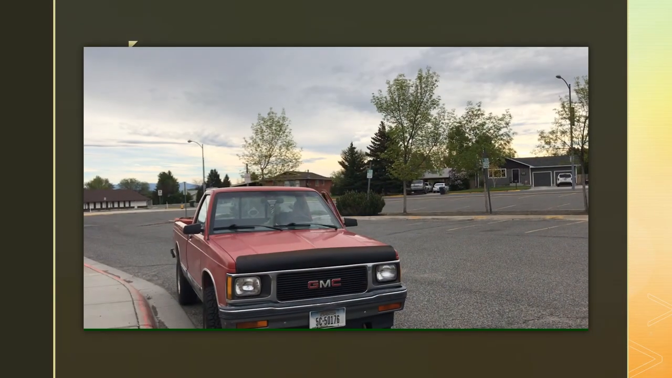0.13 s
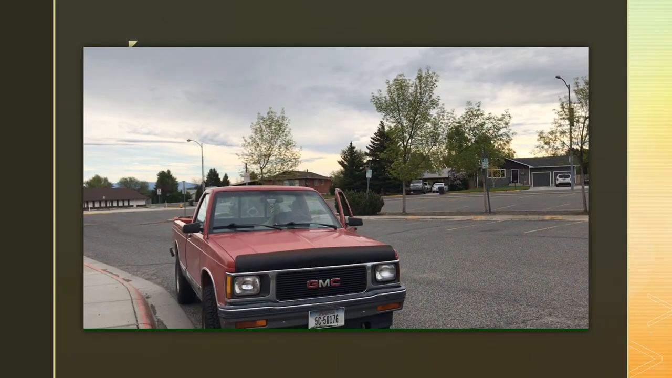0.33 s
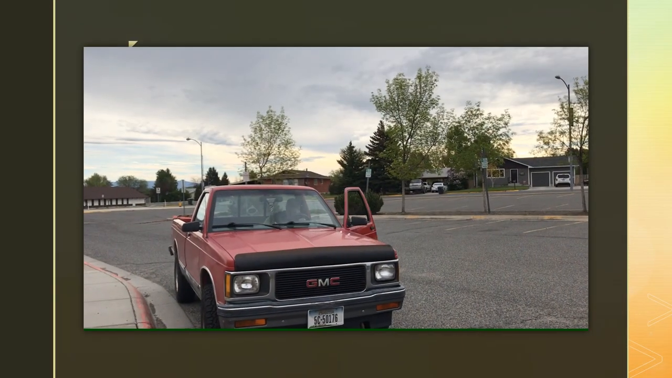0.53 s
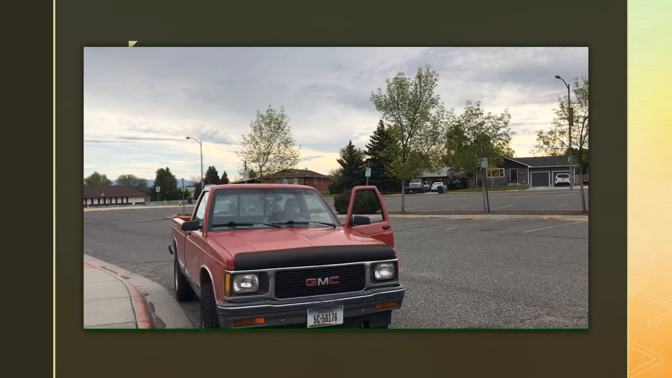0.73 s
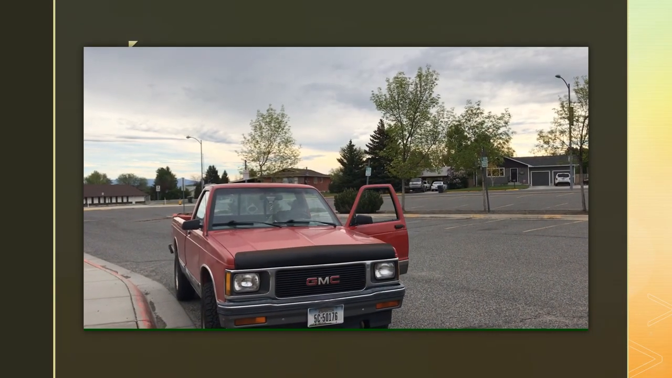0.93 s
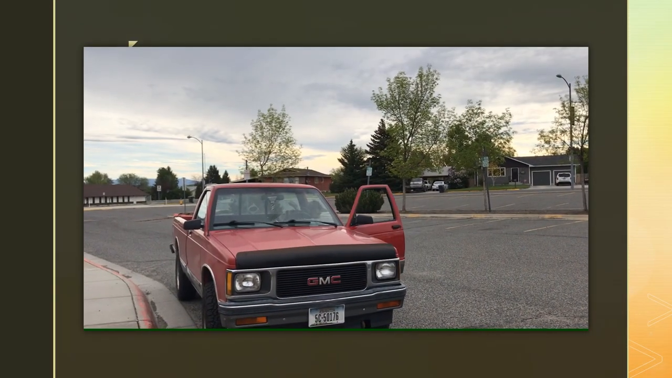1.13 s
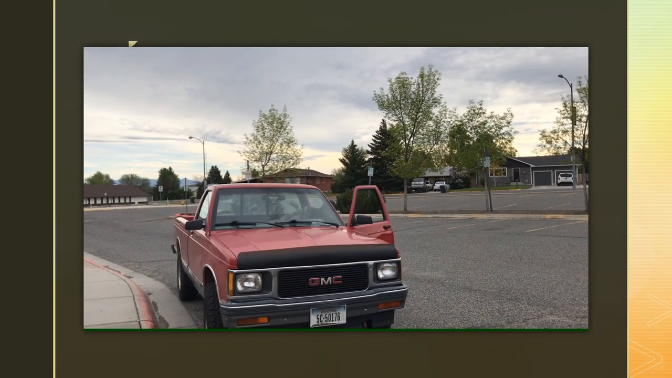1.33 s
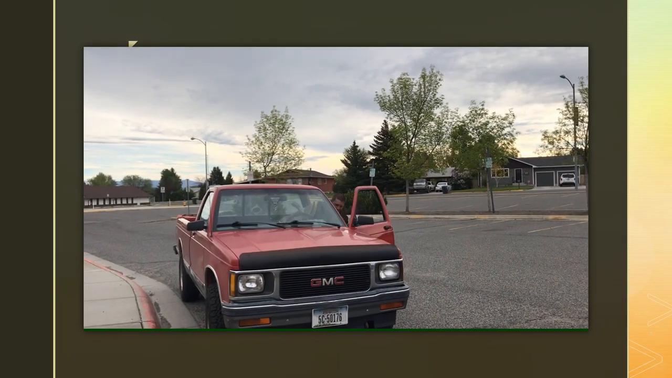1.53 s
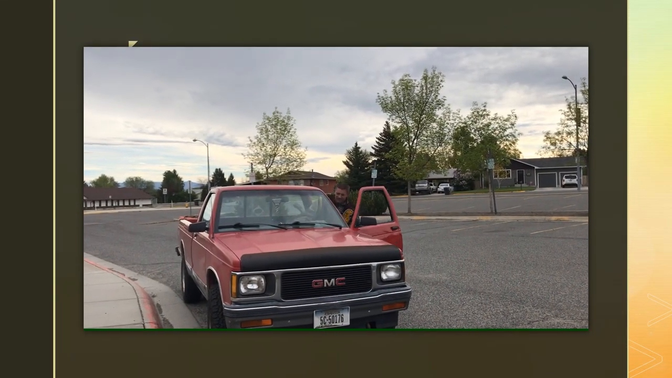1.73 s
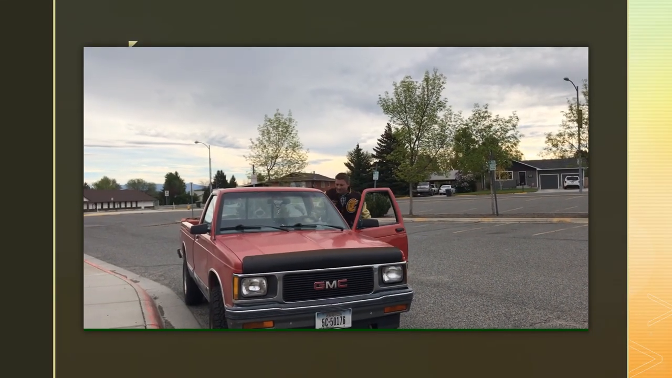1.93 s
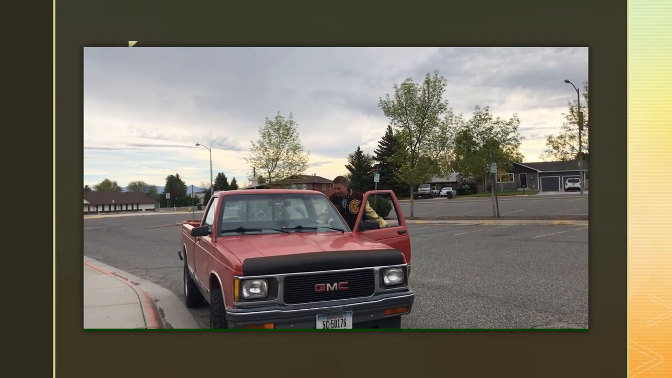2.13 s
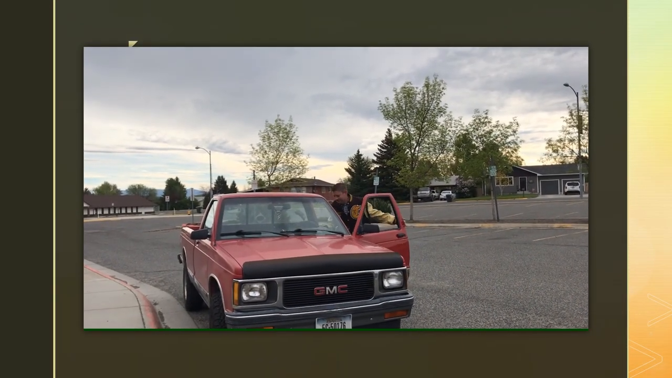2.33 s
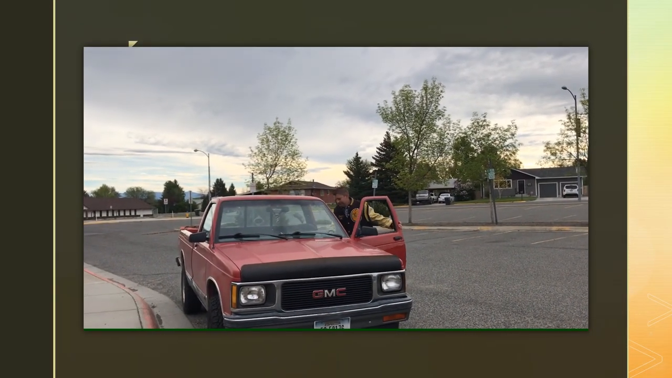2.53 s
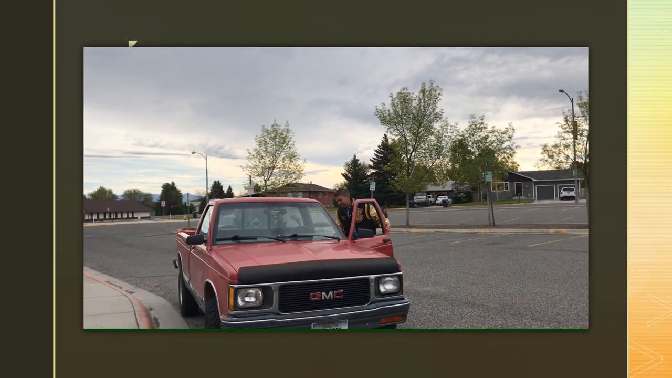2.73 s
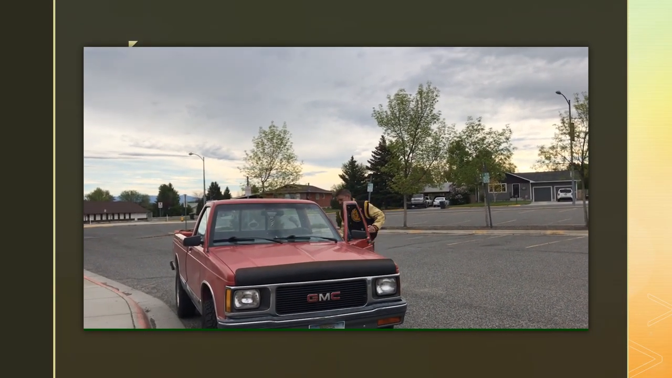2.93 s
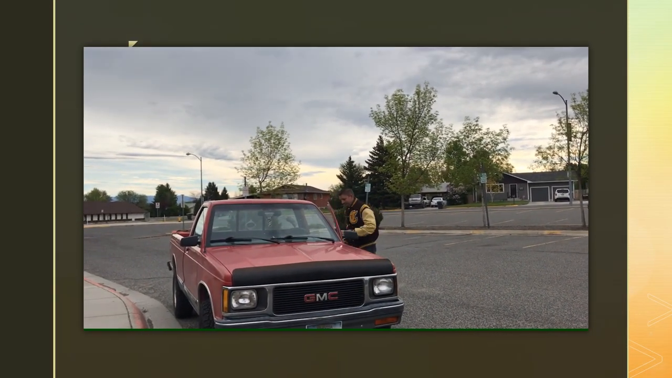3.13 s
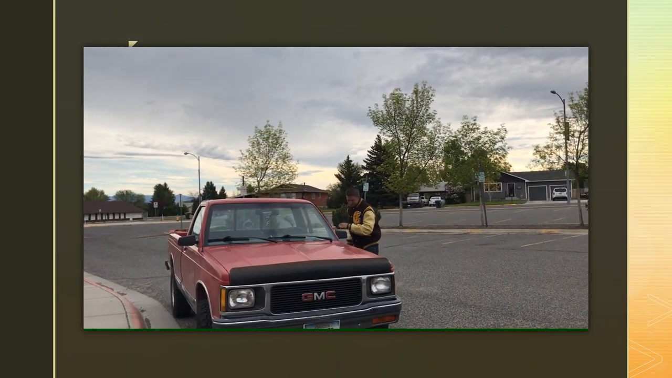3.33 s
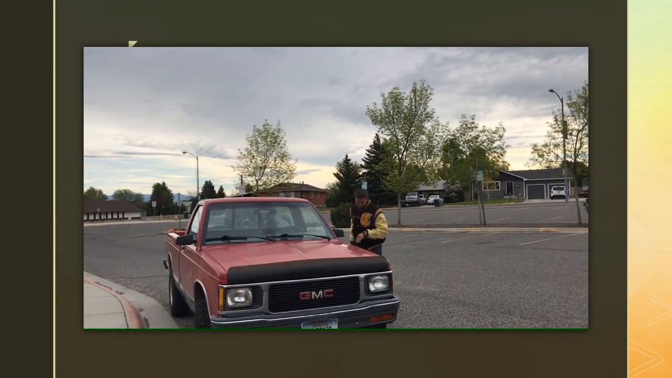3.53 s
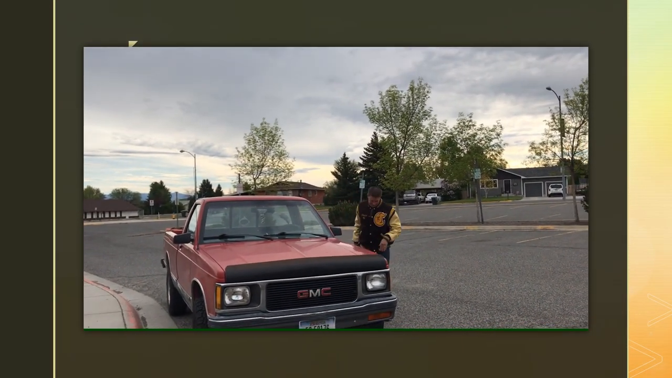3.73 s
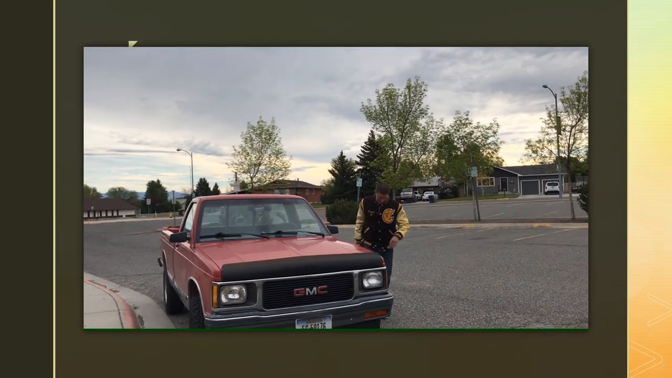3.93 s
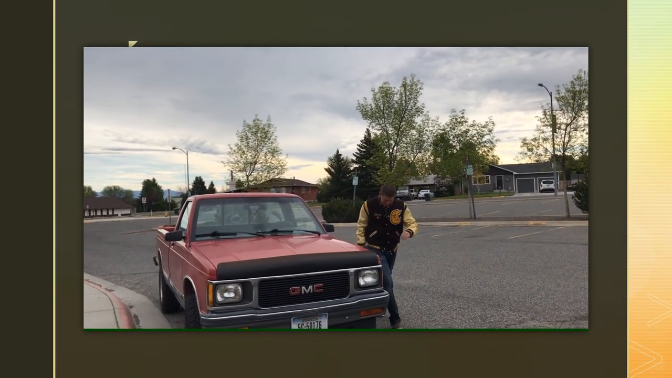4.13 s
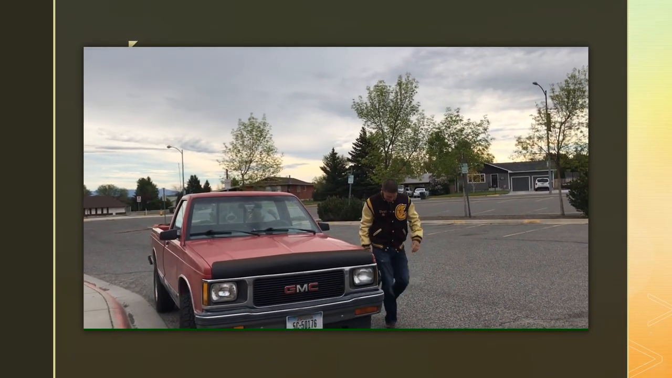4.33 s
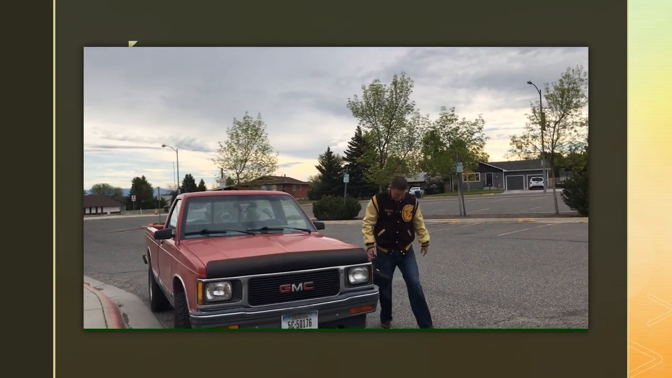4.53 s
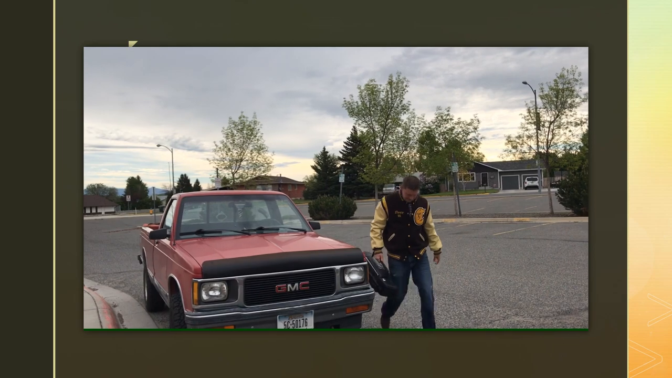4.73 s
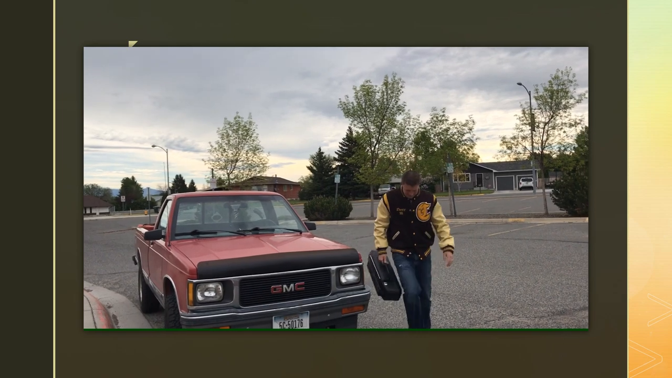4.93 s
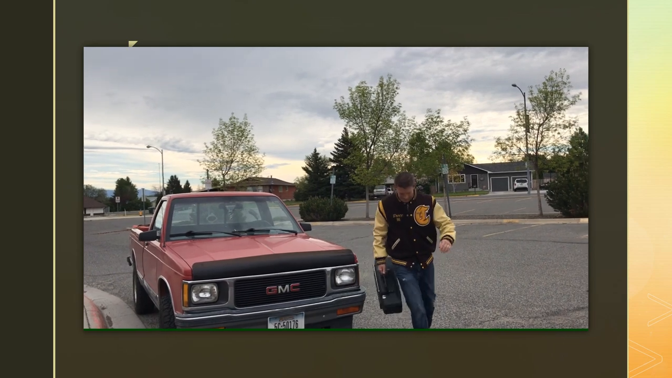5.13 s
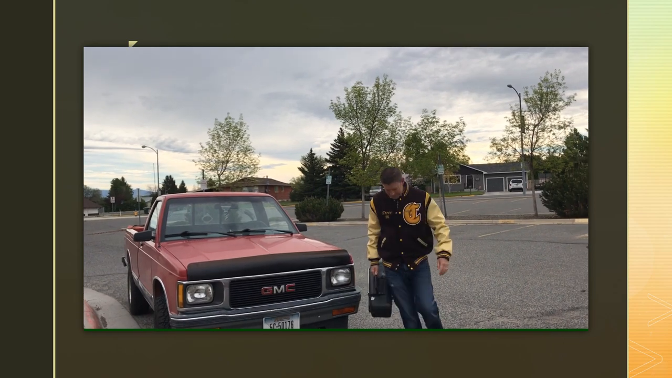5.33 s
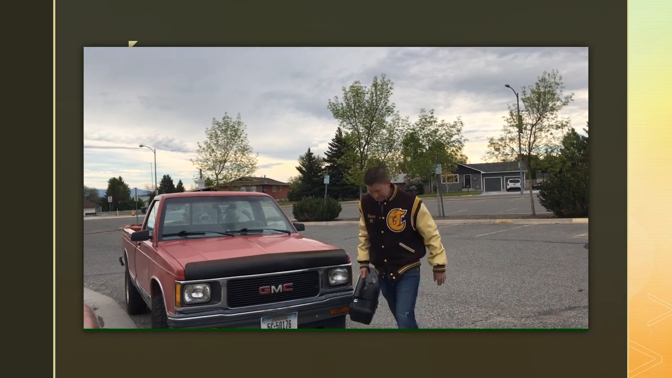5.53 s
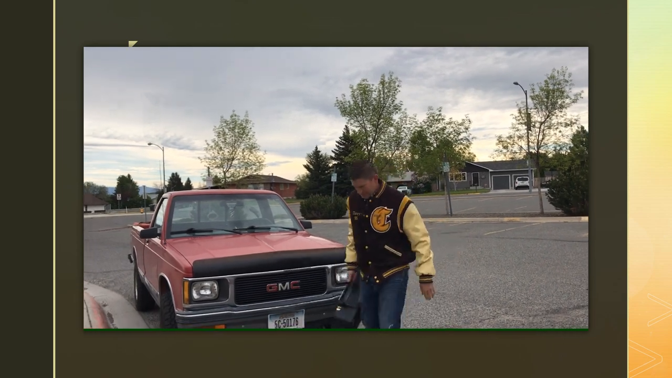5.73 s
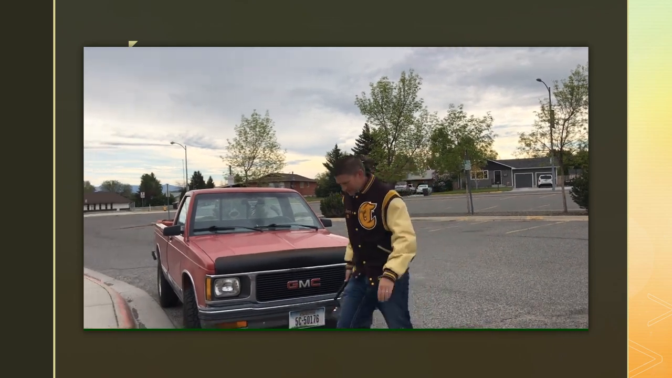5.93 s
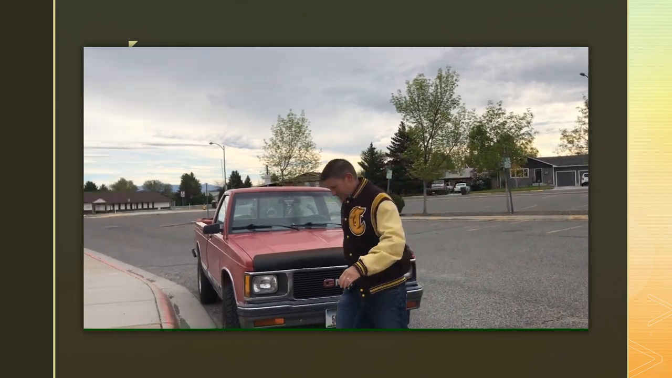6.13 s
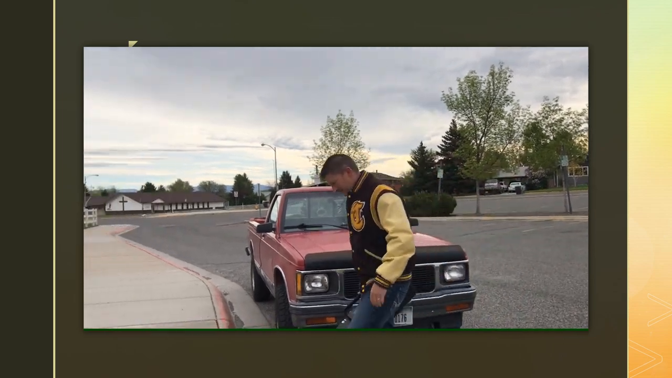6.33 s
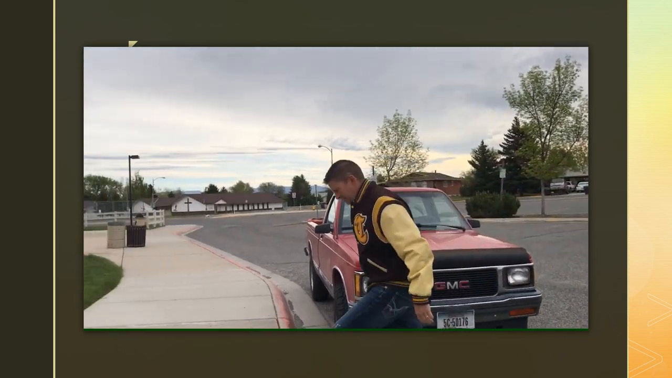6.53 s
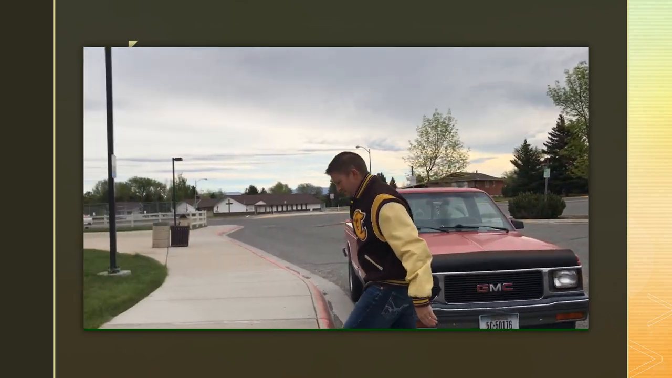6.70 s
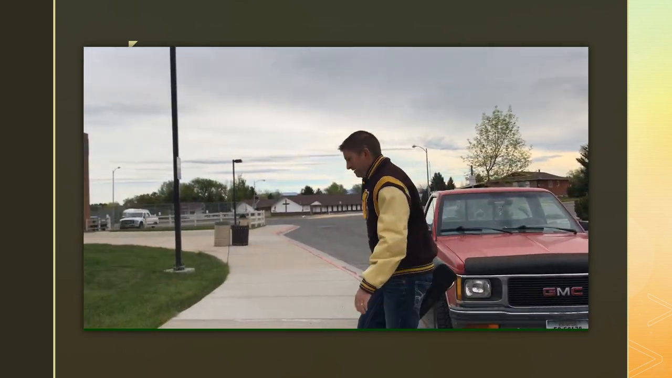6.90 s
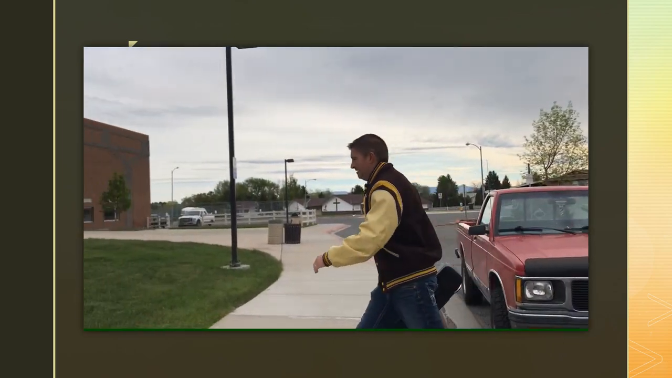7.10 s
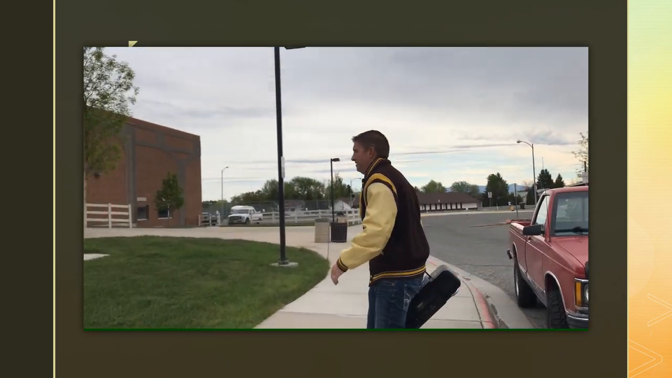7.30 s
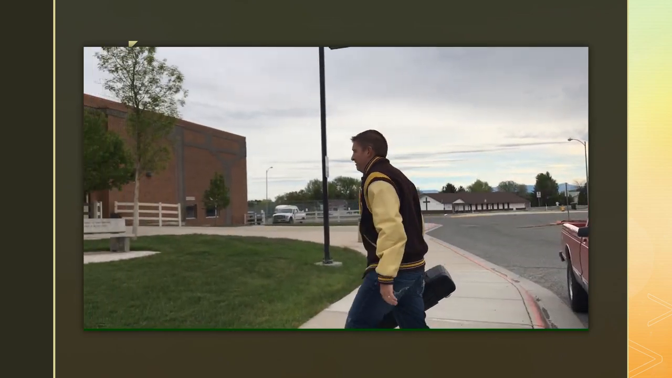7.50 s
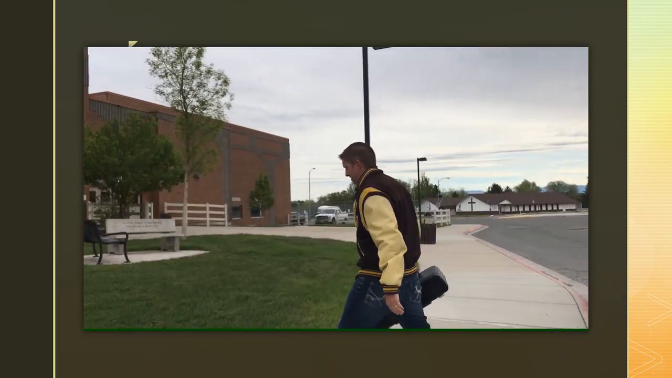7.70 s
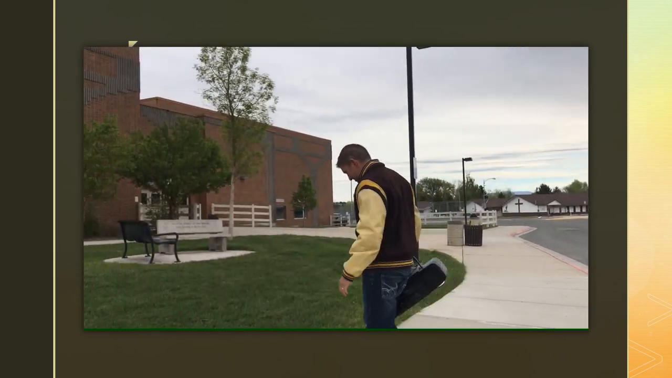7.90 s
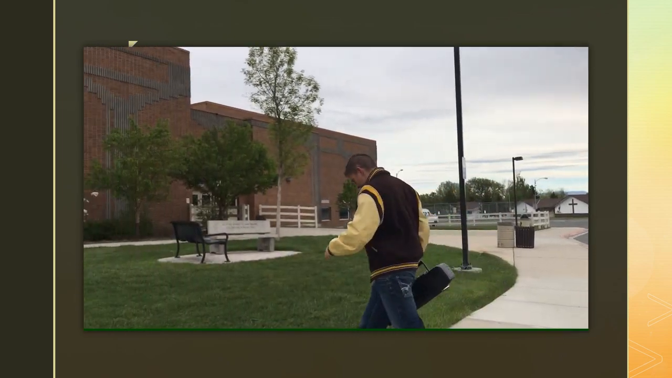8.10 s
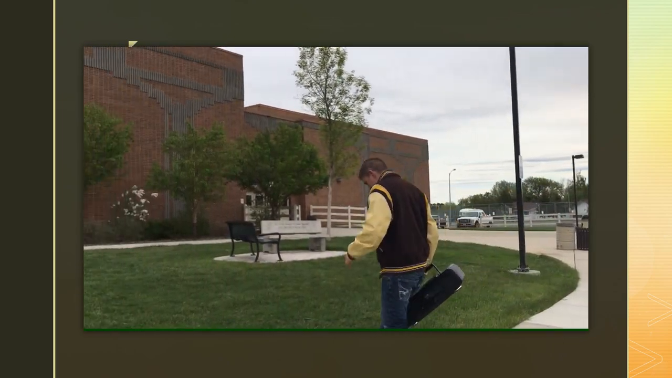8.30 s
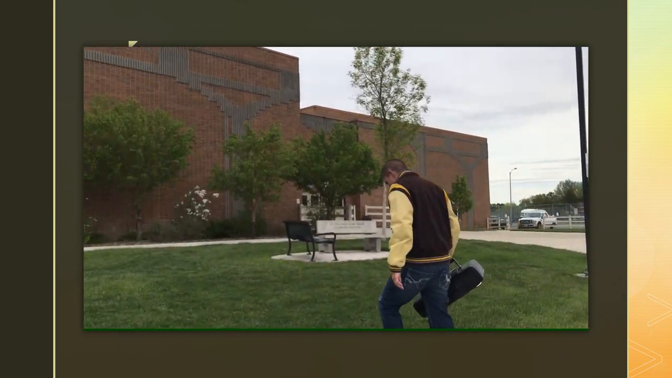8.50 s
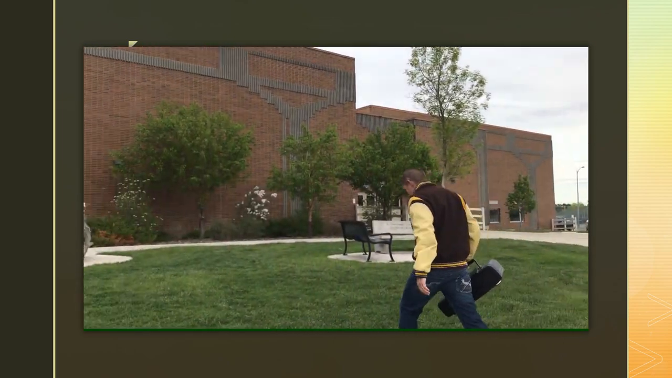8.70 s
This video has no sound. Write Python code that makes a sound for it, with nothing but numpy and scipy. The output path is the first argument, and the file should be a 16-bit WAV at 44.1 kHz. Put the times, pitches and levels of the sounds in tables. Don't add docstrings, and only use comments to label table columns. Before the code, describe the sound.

Outdoors in an open car park, a phone microphone a few metres from a pickup picks up low far traffic. Faint seat clicks and dull knocks lead to one heavy metallic door slam with rattling trim and a short dull echo. Then a hard case knocks the body, gritty footsteps pass with small latch clicks, a far bird chirps thinly, and the steps fade into soft grass.

```python
import sys
import numpy as np
from scipy import signal
from scipy.fft import rfft, irfft
from scipy.io import wavfile
from scipy.ndimage import uniform_filter1d

SR = 44100
rng = np.random.default_rng(int(sys.argv[2]) if len(sys.argv) > 2 else 0)


def volts_from_decibels(level):
    exponent = np.asarray(level, float) / 20
    return 10 ** exponent


def put_to_file(sound):
    columns = np.atleast_2d(sound).T
    safe = np.clip(columns, -1, 1)
    whole_steps = np.round(safe * 32767)
    wavfile.write(sys.argv[1], SR, whole_steps.astype(np.int16))


N = 386139
T = np.arange(N) / SR


def colour(x, table):
    hz, db = np.transpose(table)
    f = np.maximum(np.fft.rfftfreq(len(x), 1 / SR), 1)
    gain = volts_from_decibels(np.interp(np.log(f), np.log(hz), db))
    return irfft(rfft(x) * gain, len(x))


def unit(x):
    return x / np.sqrt(np.mean(x ** 2))


def ring(x, hz, t60):
    pole = np.exp(2j * np.pi * hz / SR - np.log(1000) / (t60 * SR))
    return signal.lfilter([1], [1, -pole], x).imag


def band(x, lo_hz, hi_hz, order=2):
    edges_hz = [lo_hz, min(hi_hz, .49 * SR)]
    return signal.sosfilt(signal.butter(order, edges_hz, "band", fs=SR, output="sos"), x)


def walk(rate):
    k = int(SR / rate)
    held = np.repeat(rng.standard_normal(N // k + 1), k)
    return uniform_filter1d(uniform_filter1d(held, k), k)[:N]


def add(out, s, x):
    i = int(s * SR)
    out[i:i + len(x)] += x[:N - i]


def door():
    # (time [s], crack level [dB], body level [dB], contact [ms])
    blows = [(3.435, -36, -35, 4.8), (3.458, -18, -28, 3.3), (3.464, -21, -19.5, 2.36),
             (3.4687, -20.5, -16.5, 1.2), (3.476, -27, -18, 1.2), (3.481, -36, -32, 2),
             (3.492, -43, -21, 5), (3.503, -37, -34, 4.9), (3.548, -39, -20, 9), (3.575, -53, -29.5, 3.9),
             (3.62, -50, -28, 3.1), (3.648, -50, -34, 1.6)]
    # (frequency [Hz], level [dB], t60 [s])
    cab = [(47.5, -7, 0.8), (63.4, 1, 0.17), (85, -13, 0.2), (105.2, -7.5, 0.23), (120, 8.5, 0.064),
           (150, 6, 0.045), (201, -10, 0.19), (238.7, -11, 0.17), (344.5, 0, 0.11), (400, -9, 0.11),
           (562, -16, 0.043), (719, -2, 0.06), (823, -1.5, 0.059), (960, -7, 0.056), (1090, 0, 0.05),
           (1310, -2, 0.057), (1490, -19, .07), (2000, -13, 0.052), (2660, -21.5, .06), (3480, -22.5, .06),
           (5000, -16.5, .05)]
    # (frequency [Hz], level [dB per Hz])
    crack_colour = [(380, -27), (650, -10.5), (1290, -9.5), (1800, -16.5), (1950, -14), (2200, -24),
                    (2660, -16), (4730, -14.5), (5120, -20), (6790, -22), (10300, -26.5), (13600, -34),
                    (16000, -27)]
    # (frequency [Hz], level [dB per Hz])
    rattle_colour = [(180, -27), (300, -3), (486, -10), (842, -6), (1140, -12), (1320, -13.5), (2930, -15),
                     (4440, -20.5), (5250, -24), (16000, -33)]
    start_s, crack_decay_s = 3.4, 0.0044
    rattle_t60_s, rattle_db = 0.14, -13.5
    lot_t60_s, lot_db, lot_patchy_db = 0.62, -22.5, 3.5
    cab_lag = int(0.0237 * SR)

    t = np.arange(SR) / SR
    push, crack, rattle = np.zeros((3, SR))
    for s, crack_db, body_db, ms in blows:
        u = np.clip(t - (s - start_s), 0, None)
        half_sine = np.where(u < ms / 1000, np.sin(np.pi * u / (ms / 1000)), 0)
        push += volts_from_decibels(body_db) * half_sine / (ms * SR / 1000)
        rise = volts_from_decibels(crack_db) * np.clip(u / 0.004, 0, 1)
        crack += rise * np.exp(-u / crack_decay_s) * min(2 / ms, 1) ** 2
        rattle += rise * volts_from_decibels(rattle_db) * np.exp(-np.log(1000) * u / rattle_t60_s)
    sharp = np.diff(push, prepend=0) * 8 + push

    near = np.zeros(SR)
    for k, (hz, db, t60) in enumerate(cab):
        sign = (-1) ** (k * (hz < 210))
        near += sign * volts_from_decibels(db) * ring(np.roll(sharp, cab_lag * (hz < 115)), hz, t60)
    near += crack * unit(colour(rng.standard_normal(SR), crack_colour))
    flicker = volts_from_decibels(2.2 * walk(253.3)[:SR])
    near += rattle * flicker * unit(colour(rng.standard_normal(SR), rattle_colour))

    far = rng.standard_normal(SR) * np.exp(-np.log(1000) * t / lot_t60_s) * np.clip(t / 0.094, 0, 1)
    far = band(far, 87, 2010, order=1)
    lumps = volts_from_decibels(lot_db + lot_patchy_db * walk(42.0)[:SR])
    tail = lumps * signal.fftconvolve(near, far)[:SR] / 10
    out = np.zeros(N)
    add(out, start_s, near + tail)
    return out


def buzz():
    # (frequency [Hz], level [dB], t60 [s])
    trim = [(235, 2, .06), (345, 2, .06), (420, 0, .05), (641, 0, .06), (723, 0, .06), (850, -5, .05),
            (1066, -7, .05), (1297, -6, .05), (1480, -8, .04), (1850, -10, .04), (2347, -12, .03),
            (2660, -14, .03), (3300, -14, .02), (4400, -15, .02)]
    start_s, level_db, decay_t60_s, taps_per_s = 3.475, -39, .6, 350
    u = np.clip(T - start_s, 0, None)
    chance = rng.random((2, N))
    tap_size = volts_from_decibels(-4.0 * np.log(abs(2 * chance[1] - 1) + 1e-6))
    taps = (chance[0] < taps_per_s / SR) * np.sign(chance[1] - .5) * tap_size
    i = slice(int(start_s * SR), int((start_s + 1) * SR))
    chatter = unit(sum(volts_from_decibels(db) * ring(taps[i], hz, t60) for hz, db, t60 in trim))
    out = np.zeros(N)
    out[i] = volts_from_decibels(level_db) * chatter * volts_from_decibels(-60 * u[i] / decay_t60_s) * np.clip(u[i] / .01, 0, 1)
    return out


def case():
    # (time [s], level [dB])
    knocks = [
        (4.659, -41),
        (4.667, -30),
        (4.671, -25),
        (4.674, -23.5),
        (4.677, -27),
        (4.68, -37),
    ]
    # (frequency [Hz], level [dB], t60 [s])
    shell = [(328, -12, 0.018), (694, -13, 0.016), (960, -6, 0.025), (1270, -15, 0.027), (1600, 1, 0.015),
             (1920, -3.5, 0.025), (2220, -2.5, 0.028), (2880, -4.5, 0.014), (3900, -5.5, 0.0073),
             (5340, -7, 0.007), (7400, -6, 0.0027)]
    start_s, level_db = 4.65, -1.6
    t, push = np.arange(8000) / SR, np.zeros(8000)
    for s, db in knocks:
        add(push, s - start_s, volts_from_decibels(db) * np.exp(-t[:60] / .00004) / 4)
    body = np.zeros(8000)
    for k, (hz, db, t60) in enumerate(shell):
        body += (-1) ** k * volts_from_decibels(db + level_db) * ring(push, hz, t60)
    out = np.zeros(N)
    add(out, start_s, body)
    return out


def clicks():
    snaps = { "seat frame": (980, -25, [(.947, -44.5), (1.38, -48), (1.738, -47), (2.125, -46),
             (2.601, -51)]), "heel grit": (1050, -24, [(4.152, -42), (4.182, -40), (4.205, -40.5),
             (5.135, -42), (5.147, -39), (5.197, -40.5), (5.626, -40), (5.652, -37), (5.668, -37),
             (5.885, -37.5), (6.13, -43), (6.143, -35), (6.15, -38), (6.156, -38), (6.432, -46),
             (6.629, -34), (6.656, -44), (6.685, -46), (7.166, -40.5), (7.217, -54), (7.457, -41),
             (7.711, -45)]), "toe grit": (1590, -25, [(4.751, -45), (4.768, -46), (4.777, -32),
             (5.012, -44), (5.165, -43), (5.202, -42), (5.234, -45), (6.458, -46), (7.014, -47),
             (7.723, -47), (7.945, -46), (6.63, -37), (8.383, -45), (8.677, -49)]), }
    rattles = { "case latch": (2420, -32, [(1.8, -43.5), (3.889, -50), (4.479, -47), (4.726, -47),
               (4.795, -50), (4.882, -45), (5.153, -34.5), (5.363, -45), (5.491, -38.5), (5.521, -36.5),
               (5.528, -36), (5.701, -30), (8.186, -41.5)]), "case handle": (3000, -20, [(4.703, -32),
               (5.124, -34), (5.221, -46), (5.191, -39), (5.551, -44), (5.557, -40), (6.512, -44),
               (6.613, -33), (6.672, -46), (6.709, -47), (6.728, -43.5), (6.657, -40), (6.686, -41),
               (8.383, -40), (8.394, -48), (8.482, -47), (8.633, -47)]),
               "dry stalk": (3000, 3.7, [(.759, -60), (2.281, -57), (4.211, -52), (6.506, -51),
               (7.684, -44), (8.473, -55.5), (8.492, -47)]), }
    # (time [s], peak level [dB], ring [Hz])
    soft_knocks = [
        (.945, -47, 420),
        (1.19, -49, 407),
        (1.33, -43, 328),
        (1.59, -40, 286),
        (2.392, -39, 280),
        (2.539, -39, 255),
        (3.163, -47.5, 394),
        (3.9, -45.5, 415),
    ]
    # (time [s], peak level [dB])
    heels = [
        (4.668, -44),
        (5.151, -45),
        (5.65, -43),
        (6.13, -43.5),
        (6.632, -32),
        (6.685, -34.5),
        (7.168, -41.5),
        (7.71, -47),
    ]
    heel_hz = 237.5
    pitch_spread = 0.058

    out, t = np.zeros(N), np.arange(2600) / SR
    for kind_hz, top_db, hits in {**snaps, **rattles}.values():
        for (s, db), noise in zip(hits, rng.standard_normal((len(hits), len(t)))):
            hz = kind_hz * (1 + pitch_spread * noise[-1])
            burst = noise * np.exp(-t / .0004)
            tone = ring(burst, hz, .009) + .7 * ring(burst, 1.3 * hz, .006)
            wide = band(noise * np.exp(-t / .0012), .65 * hz, 1.3 * hz + 700)
            tick = band(burst, 6000, 16000)
            main = tone / abs(tone).max() + 0.73 * wide / abs(wide).max()
            add(out, s, volts_from_decibels(db) * (0.75 * main + volts_from_decibels(top_db) * tick / abs(tick).max()))

    thuds = soft_knocks + [(s, db, heel_hz) for s, db in heels]
    for (s, db, hz), noise in zip(thuds, rng.standard_normal((len(thuds), len(t)))):
        push = noise * np.exp(-t / 0.0044)
        knock = ring(push, hz, .04) + .8 * ring(push, 1.4 * hz, .03)
        knock += .5 * ring(push, .7 * hz, .04) + .25 * ring(push, 2.3 * hz, .02)
        add(out, s, volts_from_decibels(db) * knock / abs(knock).max())
    return out


def scuffs():
    sliders = { "cloth and seal": (2630, [(.93, 0.043, -70), (1.367, 0.053, -70.5), (1.767, 0.35, -78),
               (1.98, 0.22, -65), (2.05, .075, -59), (3.557, 0.059, -59), (3.879, 0.11, -72.5)]),
               "heel": (1560, [(3.432, .024, -53), (4.145, 0.14, -64.5), (5.622, 0.074, -58.5),
               (6.124, 0.072, -62), (7.156, 0.13, -66.5), (7.705, 0.085, -65.5)]),
               "sole": (2760, [(4.662, 0.023, -50), (4.68, 0.063, -62), (4.76, 0.09, -68),
               (5.122, 0.073, -61), (5.175, 0.069, -61.5), (5.483, 0.15, -75), (5.689, 0.03, -57.5),
               (6.175, 0.061, -67), (6.605, 0.16, -62), (7.677, 0.024, -59), (7.863, 0.1, -72)]),
               "grass": (4050, [(8.142, 0.17, -72.5), (8.465, 0.082, -68), (8.51, 0.12, -70),
               (8.6, 0.12, -69)]), }
    # (from time [s], hiss over the grit [dB], grain unevenness [dB])
    ground_kinds = [
        (0, -26, 2.5),
        (4, -20, 5),
        (6.16, -8, 4),
        (8, 13.5, 1),
    ]
    # (time [s], level [dB])
    rustle = [(4, -73), (5, -67), (8, -65), (8.76, -62)]
    # (time [s], length [s], centre [Hz], half width [Hz], level [dB])
    squeak = (1.79, .22, 2200, 200, -74)

    since, hiss_db, grain_db = np.transpose(ground_kinds)
    ground = np.searchsorted(since, T, side="right").clip(1) - 1
    unevenness = walk(700) + .7 * walk(120)
    grains = rng.standard_normal(N) * volts_from_decibels(grain_db[ground] * unevenness)
    hiss = unit(band(grains, 4400, 19600, order=1))

    s, db = np.transpose(rustle)
    cloth = unit(band(rng.standard_normal(N), 670, 2740, order=1))
    out = volts_from_decibels(np.interp(T, s, db)) * (cloth + 0.24 * hiss)

    s, length, hz, width, db = squeak
    count = int(length * SR)
    vinyl = unit(band(grains[:count], hz - width, hz + width))
    add(out, s, volts_from_decibels(db) * np.hanning(count) ** .5 * vinyl)

    patchy = volts_from_decibels(2 * walk(150))
    for hz, slides in sliders.values():
        for s, length, db in slides:
            i = slice(int(s * SR), min(int((s + length) * SR), N))
            swell = abs(np.sin(np.pi * np.linspace(0, 1, len(T[i])) ** 0.73)) ** 0.92
            grit = unit(band(grains[i], hz / 1.74, hz * 1.4))
            grit = grit + 1.2 * unit(band(grains[i], hz / 4, hz * 1.62, order=1))
            out[i] += volts_from_decibels(db) * patchy[i] * swell * (grit + volts_from_decibels(hiss_db[ground[i]]) * hiss[i])
    return out


def bird():
    song = { "droop": [(4.96, .029, 3720, -65.5), (5.585, 0.046, 3440, -59.5)],
            "flat": [(5.317, 0.042, 3460, -61), (5.551, 0.013, 3350, -58), (5.907, .014, 2900, -62),
            (6.152, .02, 3270, -60)], "fall": [(5.08, 0.03, 3700, -64), (7.118, .045, 3800, -62)],
            "dive": [(5.891, 0.0146, 3300, -64), (6.073, .033, 3710, -61.5)],
            "scoop": [(5.726, 0.042, 3900, -61)], "cup": [(5.843, 0.044, 3570, -59.5)],
            "hook": [(5.445, 0.033, 4000, -66), (6.221, 0.052, 3600, -65), (6.545, 0.046, 3620, -69)],
            "tip": [(5.81, 0.029, 5250, -66)], "arch": [(6.328, .045, 3500, -66), (6.432, .045, 3630, -64),
            (6.775, .07, 3735, -66.5)], "bow": [(6.12, 0.034, 3600, -58)],
            "rise": [(5.503, .019, 3600, -64), (6.965, .026, 3150, -62)], "lift": [(6.025, .05, 4580, -69),
            (6.03, .045, 4260, -73)], "slide": [(7.065, .06, 4450, -71)], }
    slurs = {"droop": (1.01, .9, 1), "flat": (1.015, .975, 1), "fall": (1.07, .95, 1),
             "dive": (1.14, .87, 1), "scoop": (1.15, 1.03, 1), "cup": (1.15, 1.08, .8),
             "hook": (.82, .72, .6), "tip": (.97, .84, .6), "arch": (.86, .74, 1.2), "bow": (.87, .94, .9),
             "rise": (.92, 1.06, 1), "lift": (.98, 1.015, 1), "slide": (1.12, .89, 1.4)}
    # (time [s], length [s], centre [Hz], half width [Hz], level [dB])
    whine = (6.2, 1, 13447, 60, -88)

    out = np.zeros(N)
    for name, notes in song.items():
        start, end, early = slurs[name]
        for s, length, mid_hz, db in notes:
            v = np.linspace(0, 1, int(length * SR))
            u = v ** early
            hz = mid_hz * (start * (1 - u) * (1 - 2 * u) + 4 * u * (1 - u) + end * u * (2 * u - 1))
            swell = abs(np.sin(np.pi * v)) ** 0.4
            add(out, s, volts_from_decibels(db) * swell * np.sin(2 * np.pi * np.cumsum(hz) / SR))
    out *= volts_from_decibels(1.5 * walk(150))
    echo = rng.standard_normal(2000) * np.exp(-np.arange(2000) / 500) * .03
    out = out + signal.fftconvolve(out, echo)[:N]

    s, length, hz, width, db = whine
    count = int(length * SR)
    thin = unit(band(rng.standard_normal(count), hz - width, hz + width))
    add(out, s, volts_from_decibels(db) * np.hanning(count) ** .3 * thin)
    return out


def town():
    # (frequency [Hz], level [dB per Hz])
    far_colour = [(18, -53), (30, -11), (43, -1.5), (64, 2.5), (86, -4.5), (118, -12), (141, -9.5),
                  (227, -17), (259, -22.5), (394, -25.5), (632, -31.5), (1390, -35), (5310, -51.5),
                  (13000, -55), (16000, -52)]
    # (time [s], rumble level [dB])
    rumble = [(0, -47), (1, -49), (2.2, -47.5), (3, -49.5), (4, -49), (5.5, -49), (7.3, -48.5), (8.76, -48)]
    # (frequency [Hz], width [Hz], level [dB])
    drone = [(59.1, 14, -49.5), (113.8, 29.2, -51)]
    air = rfft(unit(colour(rng.standard_normal(N), far_colour)) * volts_from_decibels(-48))
    octave = np.clip(np.log2(np.maximum(np.fft.rfftfreq(N, 1 / SR), 1) / 110), 0, 7)
    low, *upper = (irfft(air * np.clip(1 - abs(octave - k), 0, 1), N) for k in range(8))
    low = low * volts_from_decibels(-8.5)
    for hz, width, db in drone:
        low += volts_from_decibels(db) * unit(ring(rng.standard_normal(N), hz, 2.74 / width))
    s, db = np.vstack(rumble).T
    swell = volts_from_decibels(np.interp(T, s, db) - np.median(db))
    return sum(b * volts_from_decibels(1.06 * walk(12)) for b in upper) + low * swell


def scene():
    return (door() + buzz() + case() + clicks() + scuffs() + bird() + town())[None]


def dropouts(x):
    # (from frequency [Hz], surviving height over neighbours [ratio], frame numbers)
    thin_frames = [(7800, 9, (42, 109, 173, 243, 323, 338, 340)), (6800, 9, (288, 289, 290)),
                   (6000, 2.2, (8, 19, 56, 145, 206)), (5000, 1.9, (153, 157)),
                   (4000, 1.9, (239, 243, 264, 344, 357)), (1200, 1.6, (306, 370, 372)),
                   (1300, 1.3, (289, 290))]
    frame, offset = 1024, 552
    x = x.copy()
    window = np.sin(np.pi * (np.arange(2 * frame) + .5) / (2 * frame))
    f = np.fft.rfftfreq(2 * frame, 1 / SR)
    for hz, height, frames in thin_frames:
        lost = np.zeros(N)
        for k in frames:
            i = offset + int(frame * (k - .37))
            lines = rfft(window * x[i:i + 2 * frame])
            around = uniform_filter1d(abs(lines), size=41)
            weak = (abs(lines) < height * around) & (f > hz)
            lost[i:i + 2 * frame] += window * irfft(lines * weak)
        x -= .97 * lost
    return x


def band_limit(x):
    return signal.sosfilt(signal.butter(12, 16450, fs=SR, output="sos"), x)


def record(dry):
    # (frequency [Hz], level [dB])
    treble_colour = [(5000, 0), (6500, -0.5), (7800, -4), (9200, -1), (10500, -4.5), (11800, 1), (13500, 2.5),
                     (15000, -2)]
    start_s, stutter_s, end_s, frame = .0832, .012, 8.7565, 1024
    x = colour(dry[0], treble_colour)
    x = signal.sosfilt(signal.butter(4, 43, "high", fs=SR, output="sos"), x)
    x = signal.sosfilt(signal.ellip(8, .2, 60, 15800, fs=SR, output="sos"), x)
    x = dropouts(x)
    x = x * np.clip((T - start_s - frame / SR) / 0.0026, 0, 1) * (T < end_s)
    first, count = int(start_s * SR), int(stutter_s * SR)
    scrap = x[first + frame:first + frame + count]
    x[first:first + count] = scrap * np.clip(np.linspace(12, 0, count), 0, 1)
    return band_limit(x[None])


dry = scene()
out = record(dry)
put_to_file(out)
```